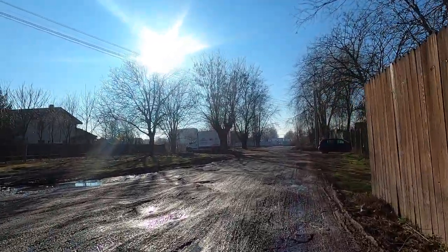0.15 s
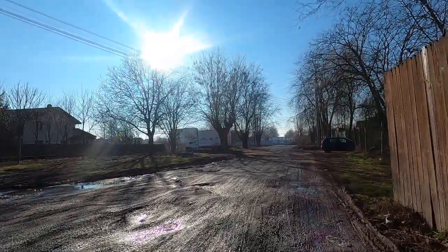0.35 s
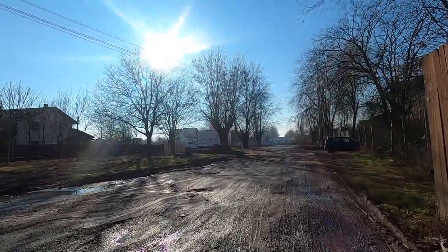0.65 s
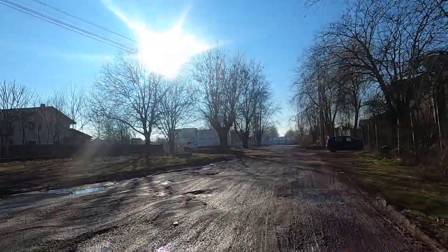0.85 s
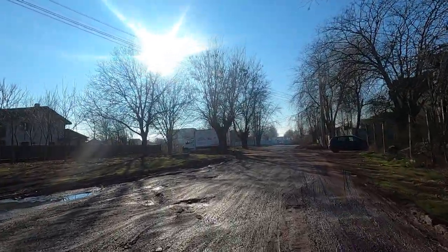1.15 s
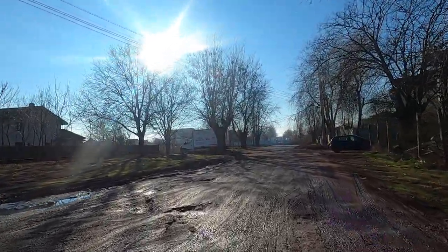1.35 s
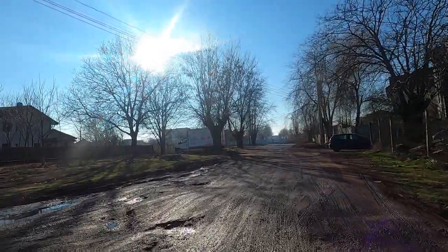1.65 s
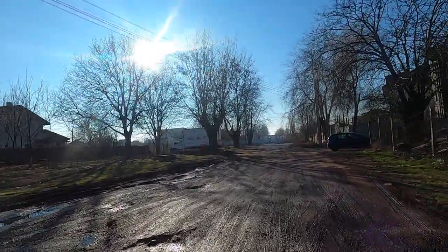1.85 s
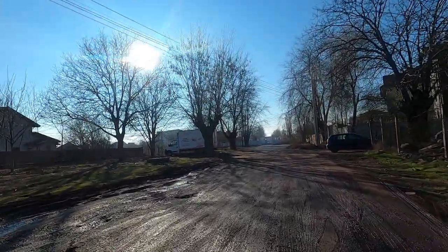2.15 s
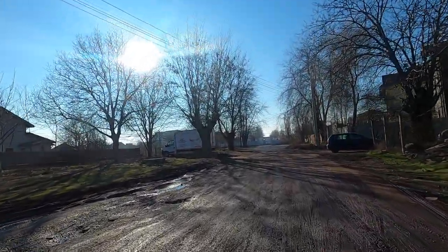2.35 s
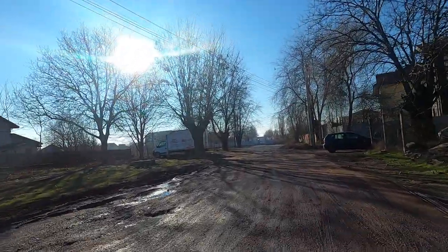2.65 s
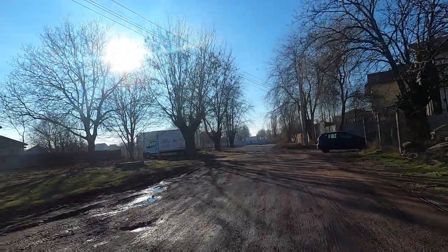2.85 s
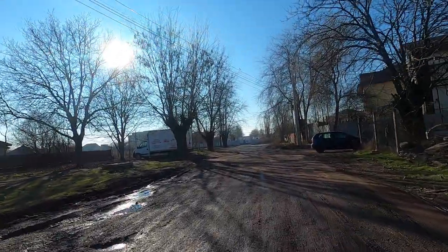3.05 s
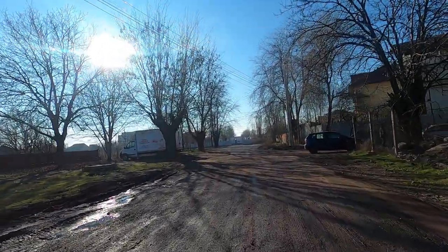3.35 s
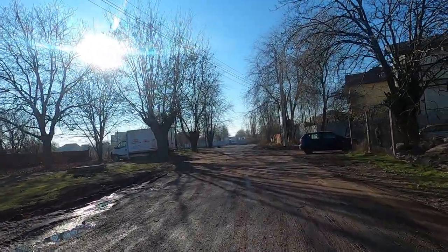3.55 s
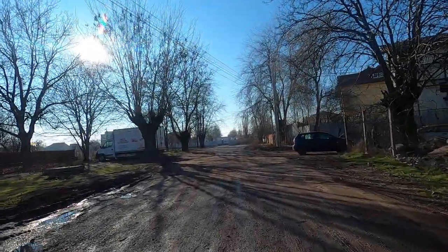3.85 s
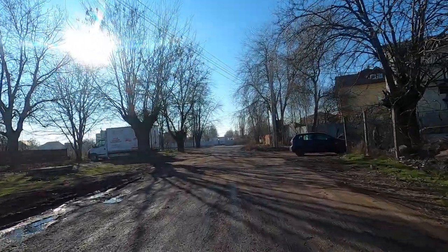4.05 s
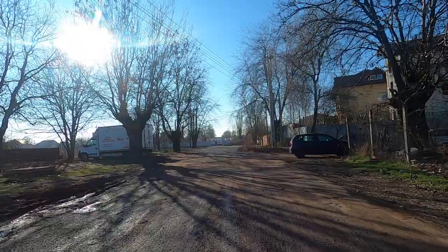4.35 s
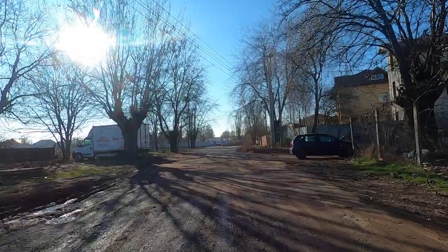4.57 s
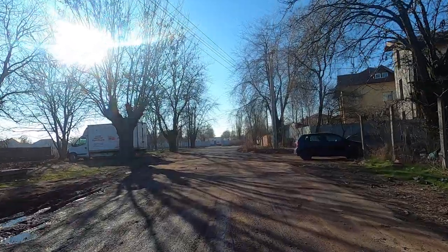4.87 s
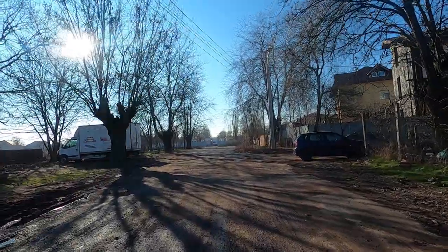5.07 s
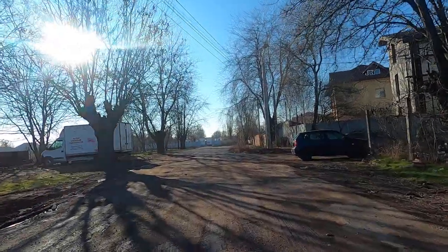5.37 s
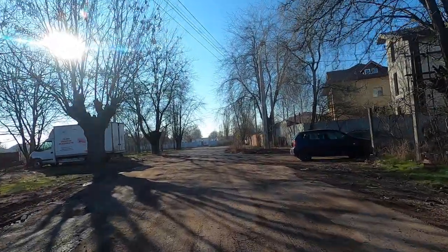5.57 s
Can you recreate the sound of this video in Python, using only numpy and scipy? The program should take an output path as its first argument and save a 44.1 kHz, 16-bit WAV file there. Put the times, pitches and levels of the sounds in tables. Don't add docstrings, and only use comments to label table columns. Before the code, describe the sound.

Close-up bike ride over mud: soft tyre hiss, popping grit, loose-part rattles, a deep wavering hum and wind thumping the microphone.

```python
import sys
import numpy as np
from scipy import signal
from scipy.fft import rfft, irfft
from scipy.io import wavfile
from scipy.ndimage import uniform_filter1d

SR = 44100
rng = np.random.default_rng(int(sys.argv[2]) if len(sys.argv) > 2 else 0)


def dump_mix(stems):
    frames = np.atleast_2d(stems).T
    limited = np.clip(frames, -1, 1)
    pcm = np.round(limited * 32767).astype(np.int16)
    wavfile.write(sys.argv[1], SR, pcm)


def magnitude_from_level(level_db):
    exponent = np.asarray(level_db, float) / 20
    return 10 ** exponent


N = 251811
STEP = 128


def unit(x):
    return x / np.sqrt(np.mean(x ** 2))


def curves(table):
    s, *columns = np.transpose(table)
    return [np.interp(np.arange(N) / SR, s, c) for c in columns]


def band(x, lo_hz, hi_hz, order=2):
    return signal.sosfilt(signal.butter(order, [lo_hz, hi_hz], "bandpass", fs=SR, output="sos"), x)


def walk(rate_hz):
    k = int(SR / rate_hz)
    x = np.repeat(rng.standard_normal(N // k + 1), k)
    return unit(uniform_filter1d(uniform_filter1d(x, k), k)[:N])


def ring(x, modes):
    out = 0
    for hz, db, t60_s in modes:
        r = np.exp(-np.log(1000) / (t60_s * SR))
        w = 2 * np.pi * hz / SR
        out = out + magnitude_from_level(db) * signal.lfilter([np.sin(w)], [1, -2 * r * np.cos(w), r * r], x)
    return out


def colour(x, points):
    hz, db = np.transpose(points)
    grid_hz = np.linspace(1, SR / 2, 513)
    log_gain = np.log(magnitude_from_level(np.interp(np.log(grid_hz), np.log(hz), db)))
    cepstrum = irfft(log_gain)
    cepstrum[1:512] *= 2
    cepstrum[513:] = 0
    return signal.fftconvolve(x, irfft(np.exp(rfft(cepstrum))))[:N]


def add(track, s, piece):
    i = int(s * SR)
    track[i:i + len(piece)] += piece[:N - i]


def dull(x, hz=7500):
    return signal.sosfilt(signal.butter(5, hz, fs=SR, output="sos"), x)


def even(x, span_s):
    return unit(x / np.sqrt(uniform_filter1d(x ** 2, int(span_s * SR)) + 0.83 * np.mean(x ** 2)))


def swells(s, hold_s, db, rise_db_s, fall_db_s):
    t = np.arange(0, N, STEP)[None] / SR - s[:, None]
    rise_db = rise_db_s * np.minimum(t, 0)
    fall_db = fall_db_s * np.maximum(t - hold_s[:, None], 0)
    return magnitude_from_level(2 * np.maximum(db[:, None] + rise_db - fall_db, -150))


def smooth(x):
    return np.interp(np.arange(N), np.arange(len(x)) * STEP, x)


def total_db(power, under_db):
    return 10 * np.log10(smooth(power.sum(axis=0)) + magnitude_from_level(2 * under_db))


def mount():
    # (time [s], hold [s], level [dB], pitch [Hz])
    jolts = [(0.102, 0.1, -32.5, 78.05), (0.314, 0.024, -28, 70.5), (0.376, 0.088, -27.5, 75.4),
             (0.56, 0.061, -32.5, 79.8), (0.66, 0.11, -27, 74.66), (0.862, 0.043, -24, 80.04),
             (0.988, 0.053, -22, 74.13), (1.061, 0.082, -20, 76.5), (1.212, 0.05, -25, 76.05),
             (1.374, 0.035, -17, 75.9), (1.482, .12, -16.5, 77.44), (1.668, 0.23, -18.5, 77.03),
             (1.986, .24, -22.5, 75.4), (2.278, 0.11, -28, 71.05), (2.49, 0.14, -20.5, 77.07),
             (2.65, .115, -17.5, 77), (2.984, 0.12, -17, 78.26), (3.22, 0.093, -26, 79.9),
             (3.422, 0.02, -27, 86.6), (3.552, 0.046, -22.5, 80.3), (3.695, 0.015, -21, 77.3),
             (3.748, .012, -18, 85), (3.795, .03, -23, 77), (3.894, 0.046, -29, 74),
             (4.06, 0.015, -25.5, 77.7), (4.118, 0.12, -29, 70.9), (4.359, 0.085, -21, 75.94),
             (4.49, 0.013, -28.5, 80), (4.62, 0.062, -24, 83.1), (4.787, 0.099, -20.5, 90.75),
             (4.944, 0.07, -19.5, 79.26), (5.106, 0.26, -23.5, 69.98), (5.395, 0.32, -27, 79.9)]
    s, hold_s, db, hz = np.transpose(jolts)
    power = swells(s, hold_s, db, rise_db_s=301, fall_db_s=271)
    level_db = total_db(power, -70)
    pitch_hz = smooth(hz @ power / power.sum(axis=0)) + 2.458 * walk(13)
    tone = np.sqrt(2) * np.sin(2 * np.pi * np.cumsum(pitch_hz) / SR) * magnitude_from_level(0.21 * walk(8.7))
    shake = even(band(rng.standard_normal(N), 66, 94), span_s=0.051)
    return magnitude_from_level(level_db) * (magnitude_from_level(-1.0) * tone + magnitude_from_level(-11.5) * shake)


def wind():
    # (time [s], level [dB])
    breeze = [
        (0, -36),
        (.7, -38),
        (1.3, -35.5),
        (2.1, -30),
        (3.2, -34),
        (3.9, -28),
        (4.6, -35),
        (4.95, -28),
        (5.5, -24.5),
        (5.71, -24),
    ]
    # (time [s], hold [s], level [dB], sharpness [dB])
    gusts = [(0.348, .01, -33.5, -12), (0.423, 0.066, -29.5, -25), (0.858, 0.15, -37, -10),
             (1.095, .01, -24, -28), (1.419, 0.037, -26, -5.5), (1.509, .03, -29.5, 3),
             (1.557, 0.049, -26, -25), (1.7, 0.07, -25.5, -24), (2.031, 0.058, -29.5, -11.5),
             (2.225, 0.03, -30.5, 1), (2.296, 0.21, -33, -6.5), (2.605, 0.15, -31, 2),
             (2.768, 0.023, -30, -19), (2.861, 0.015, -25, -1.5), (3.021, 0.11, -28.5, -37),
             (3.29, 0.053, -38, -3), (3.43, 0.031, -33, 1), (3.663, 0.1, -28, -17),
             (3.832, 0.019, -31, -11), (3.986, 0.025, -31, -7.5), (4.19, 0.045, -35, 3.5),
             (4.297, 0.23, -34.5, -2.5), (4.715, 0.11, -22, -9.5), (4.903, 0.11, -26.5, -11),
             (5.08, 0.019, -27, -2), (5.171, 0.18, -26.5, -2), (5.432, 0.028, -36, 5),
             (5.549, 0.043, -28, -17), (5.641, 0.013, -28, 3)]
    # (time [s], peak [dB], pitch [Hz])
    thumps = [(1.486, -22, 220.2), (1.545, -24, 400), (3.03, -24, 215), (2.246, -31, 249),
              (2.624, -19.5, 232), (2.661, -33, 290), (2.705, -23.5, 325), (2.847, -26, 277),
              (3.651, -29, 231), (2.661, -18, 193), (2.68, -18, 195), (2.729, -38, 203),
              (2.864, -26.5, 398.1), (2.89, -29, 240), (3.707, -27, 180), (3.713, -18, 155),
              (3.729, -27, 250), (3.742, -23, 300), (5.066, -26, 191), (5.108, -23, 193), (5.214, -27, 170),
              (5.246, -18, 198), (5.39, -22, 200), (5.149, -16, 194), (5.347, -13, 210), (5.6335, -17, 300),
              (5.639, -12, 170), (5.653, -14, 60)]
    gust_deep_db, lull_body_db, lull_edge_db = -11, -11, -10
    breeze_db, = curves(breeze)
    s, hold_s, db, sharp_db = np.transpose(gusts)
    power = swells(s, hold_s, db, rise_db_s=304.5, fall_db_s=251)
    deep_db = total_db(power * magnitude_from_level(2 * gust_deep_db), breeze_db + 2.5 * walk(9))
    body_db = total_db(power, breeze_db + lull_body_db) + 2.78 * walk(25)
    edge_db = total_db(power * magnitude_from_level(2 * sharp_db)[:, None], breeze_db + lull_edge_db) + 2.65 * walk(35) - 4.0
    eddies = rng.standard_normal((3, N))
    deep = even(band(eddies[0], 19.4, 68.0, order=3), span_s=0.26)
    body = even(band(eddies[1], 91.1, 133.1, order=3), span_s=0.094)
    edge = even(band(band(eddies[2], 134, 162, order=1), 168.3, 480), span_s=0.099)
    out = magnitude_from_level(deep_db) * deep + magnitude_from_level(body_db) * body + magnitude_from_level(edge_db) * edge
    t = np.arange(int(0.012 * SR)) / SR
    swell = t / .003 * np.exp(1 - t / .003)
    for s, db, hz in thumps:
        add(out, s, magnitude_from_level(db - 3) * np.sin(2 * np.pi * hz * t) * swell)
    return out


def tyres():
    # (time [s], level [dB], grittiness [dB])
    roll = [(0, -46.5, 2), (.35, -46.5, -11), (.7, -49.5, -1.5), (1.2, -48, -25), (1.5, -51, 5.5),
            (1.95, -47.5, -14), (2.33, -51, -11), (2.65, -43, 1), (2.9, -47.5, 0.5), (3.45, -52, 6.5),
            (3.8, -51, 2.5), (4.05, -49, 4.5), (4.35, -53.5, 11.5), (4.72, -53.5, 4.5), (4.95, -46, -1),
            (5.2, -46.5, -1), (5.55, -49, 5), (5.71, -46, 3)]
    # (frequency [Hz], level per Hz [dB])
    tread_points = [(200, -9.5), (400, -7), (800, -12.5), (1800, -11.5), (2700, -9.5), (3050, -9),
                    (3450, -6.5), (4000, -9), (4650, -6.5), (5500, -12), (7600, -21), (9000, -28),
                    (12700, -38.5), (15500, -58)]
    # (frequency [Hz], width [Hz], level [dB])
    frame_modes = [(520, 46, 0), (571, 44, -3.5), (677, 43, -14)]
    # (time [s], hold [s], level [dB])
    splashes = [(0.2, .005, -50), (0.293, 0.033, -56), (0.603, 0.033, -62.5), (0.897, 0.015, -62),
                (1.203, 0.02, -55.5), (1.355, 0.021, -53.5), (1.53, 0.011, -49.5), (1.78, 0.016, -57),
                (1.978, 0.018, -53), (2.047, .02, -55.5), (2.08, .01, -57), (2.204, 0.0032, -52),
                (2.346, .008, -65), (2.448, .02, -62), (2.384, 0.036, -60), (2.543, 0.0083, -54),
                (3.007, 0.026, -50.5), (3.22, 0.0084, -71), (3.292, 0.012, -59.5), (3.431, 0.011, -58),
                (3.469, .01, -63), (3.926, 0.067, -55.5), (4.235, 0.053, -59), (4.315, 0.03, -61.5),
                (4.547, 0.023, -77), (4.638, 0.016, -61), (4.741, 0.083, -60), (4.888, .02, -69),
                (5.243, .01, -55), (5.448, 0.0065, -55), (5.634, 0.0075, -73)]
    # (time [s], hold [s], level [dB])
    ruts = [(0.03, 0.17, -48.5), (0.923, 0.035, -51), (1.14, .03, -59), (1.374, .02, -51),
            (1.471, 0.032, -43), (2.053, 0.076, -49), (2.22, 0.0084, -47), (3.026, 0.066, -50),
            (3.109, 0.043, -43), (3.448, .02, -45), (4.846, 0.12, -42.5), (5.004, 0.53, -45)]
    splash_mud_db, splash_grit_db = 4, 3
    fork_hz, fork_width_hz, fork_db = 207.2, 12.4, -46.5
    grain_share = .65

    roll_db, gritty_db = curves(roll)
    swing_db = roll_db - roll_db.mean()
    splash = swells(*np.transpose(splashes), rise_db_s=499, fall_db_s=260)
    rut = swells(*np.transpose(ruts), rise_db_s=200, fall_db_s=600)
    grit_db = total_db(splash * magnitude_from_level(2 * splash_grit_db), roll_db + gritty_db)
    mud_db = total_db(splash * magnitude_from_level(2 * splash_mud_db), roll_db)
    spray_db = total_db(splash, 0.44 * swing_db + 0.053 * gritty_db - 59.5)
    ring_db = total_db(rut, 0.14 * swing_db - 50.5)

    bunch = walk(30)
    pops = 0
    for hz in 900 * 2 ** np.arange(0, 2.9, .36):
        chance = rng.random((3, N))
        pops_per_s = 170 * magnitude_from_level(4.5 * bunch + 4.5 * walk(60))
        size_db = np.minimum(-3.5 * np.log(chance[1]), 10.5)
        hits = (chance[0] < pops_per_s / SR) * magnitude_from_level(size_db) * np.sign(chance[2] - .5)
        pops = pops + band(hits, hz / 1.12, hz * 1.12)
    hiss = rng.standard_normal(N) * magnitude_from_level(0.089 * bunch + 1.0 * walk(65))
    tread = colour(unit(hiss) + grain_share * unit(pops), tread_points)
    low = signal.sosfiltfilt(signal.butter(1, 2000, fs=SR, output="sos"), tread)
    mud, grit = unit(low), unit(tread - low)
    mist = rng.standard_normal(N) * magnitude_from_level(0.95 * bunch + 2.6 * walk(70))
    spray = unit(band(colour(mist, tread_points), 6980, 14700))

    road = rng.standard_normal(N) * magnitude_from_level(2.35 * walk(24.55))
    frame = 0
    for hz, width_hz, db in frame_modes:
        frame = frame + magnitude_from_level(db) * unit(band(road, hz - width_hz / 2, hz + width_hz / 2, order=1))
    fork = unit(band(road, fork_hz - fork_width_hz / 2, fork_hz + fork_width_hz / 2, order=1))
    fork = fork * magnitude_from_level(1.4 * walk(5.98))
    rolling = magnitude_from_level(grit_db - 6.0) * grit + magnitude_from_level(mud_db + 3.5) * mud + magnitude_from_level(spray_db + 1.0) * spray
    return rolling + magnitude_from_level(ring_db - 0.5) * unit(band(frame, 520, 750)) + magnitude_from_level(fork_db) * fork


def snaps():
    # (time [s], peak [dB], centre [Hz])
    snap_events = [(0.277, -23, 4240), (0.591, -22.5, 4430), (0.753, -24, 4800), (1.03, -26, 4770),
                   (1.487, -20, 4330), (1.6692, -23, 4560), (3.3569, -21, 3600), (1.764, -18, 3910),
                   (1.776, -24, 3400), (2.6152, -16.5, 3498), (2.6231, -19, 3460), (2.7355, -31, 3614),
                   (2.807, -11.5, 3733), (2.9, -23, 4326), (3.0075, -10.5, 4600), (3.2308, -21, 3290),
                   (3.3555, -19, 3490), (3.3672, -14, 4100), (3.4392, -14, 4000), (3.5065, -23, 3850),
                   (3.997, -24, 3255), (4.3287, -22.5, 3440), (4.4207, -17, 3310), (4.7662, -26.5, 3384),
                   (5.0046, -16.5, 3600), (5.145, -21.5, 3986), (5.3086, -23, 3260)]
    # (time [s], peak [dB], centre [Hz])
    pop_events = [(2.7843, -22, 1250), (0.447, -24.5, 1750), (1.1787, -26, 2710), (1.351, -24, 2150),
                  (1.4674, -23, 1680), (1.5243, -30, 2310), (1.9686, -32, 2820), (2.0401, -21, 2370),
                  (2.0631, -20.5, 1560), (2.156, -21.5, 3250), (2.1911, -21.5, 2416), (2.245, -27, 2310),
                  (2.656, -28, 1590), (2.83, -34, 2404), (2.873, -22.5, 2330), (3.3194, -35, 2254),
                  (3.5767, -21.5, 2690), (3.5824, -22, 2548), (3.7674, -25.5, 2290), (3.9436, -22.5, 2830),
                  (4.0264, -27, 2690), (4.6403, -21, 2738), (4.7863, -29, 1766), (5.0666, -15.5, 2640),
                  (5.5657, -24, 1500), (5.6733, -19.5, 2320)]
    # (time [s], peak [dB], centre [Hz])
    crack_events = [(0.3149, -14.5, 2150), (0.612, -19, 1900), (1.2077, -12, 1600), (2.427, -16, 2860),
                    (2.6098, -4, 2180), (2.6372, -16, 1762), (2.6755, -10.5, 2290), (2.6951, -9, 2200),
                    (2.7096, -4.5, 1750), (5.2586, -6.5, 1720), (5.2786, -15, 2470), (5.4565, -14, 1847)]
    # (time [s], peak [dB], centre [Hz])
    tick_events = [(0.051, -31, 4490), (.5222, -31, 3300), (.7292, -28, 3110), (.9168, -30, 3380),
                   (1.4331, -32, 3640), (1.692, -29, 2290), (1.8003, -39, 3466), (1.9675, -32, 4000),
                   (2.004, -28, 4500), (2.0403, -27, 4500), (2.0794, -29, 4600), (2.1567, -26, 4535),
                   (2.2455, -33, 4720), (2.3403, -30.5, 3796), (2.4025, -26, 3013), (2.4207, -34, 4600),
                   (2.441, -34, 4700), (2.668, -27, 2800), (2.7838, -29, 2372), (2.8295, -25, 3470),
                   (3.2091, -31, 4650), (3.2851, -25, 3800), (3.3187, -29, 4300), (3.4333, -17, 4300),
                   (3.565, -31, 4395), (3.6112, -31, 4534), (3.7749, -24, 4835), (3.8937, -27, 3410),
                   (3.9723, -26, 4090), (4.0645, -29, 2990), (4.0823, -26, 3500), (4.3462, -26, 4510),
                   (4.3718, -24, 4263), (4.4746, -25, 4600), (5.012, -26, 3992), (5.1066, -29, 3320),
                   (5.2111, -28, 3610), (5.2335, -29, 4480), (5.248, -23.5, 4180), (5.346, -27, 3200),
                   (5.3806, -30, 4550), (5.394, -24, 4500), (5.4266, -26, 3390), (5.4546, -20.5, 3980),
                   (5.59, -31, 2608), (5.611, -24.5, 3917), (3.359, -18, 4500), (2.625, -20, 3000),
                   (2.6577, -24, 3300), (2.4677, -30, 1700), (2.7375, -24, 1700), (2.9002, -26, 1300),
                   (5.113, -28, 3330), (5.1449, -26, 1400), (2.683, -24, 3300)]
    # (spread [octaves], fizz [dB])
    kinds = [
        (.36, -19),
        (.5, -21),
        (1.05, -23),
        (0.38, -17),
    ]
    lead_s, fizz_s = .002, .0034
    out = np.zeros(N)
    t = np.arange(int(0.039 * SR)) / SR - lead_s
    burst = np.arange(len(t)) == int(lead_s * SR)
    fizz = np.exp(-np.abs(t) / np.where(t < 0, lead_s, fizz_s))
    groups = (snap_events, pop_events, crack_events, tick_events)
    for events, (octaves, fizz_db) in zip(groups, kinds):
        spread = 2 ** octaves
        for s, db, hz in events:
            noise = rng.standard_normal(len(t))
            source = burst + magnitude_from_level(fizz_db) * noise * fizz
            crack = band(source, hz / spread, min(hz * spread, 9000), order=3)
            add(out, s + 0.001297 - lead_s, -magnitude_from_level(db - 6.5) * crack / np.abs(crack).max())
    return dull(out, hz=5600)


def yelps():
    # (time [s], length [s], pitch [Hz], level [dB], octave [dB])
    calls = [
        (.12, 0.085, 498, -55, 15),
        (.2, 0.048, 504, -52, 2),
        (2.09, 0.13, 520, -37.5, -12),
        (4.77, .08, 520, -38.5, -21),
        (4.82, 0.048, 520, -33, -19),
        (4.867, .035, 507.3, -29, -16),
        (5.31, 0.13, 519.6, -35, -12),
    ]
    out, waver = np.zeros(N), walk(140)
    for s, length_s, hz, db, octave_db in calls:
        n = int(length_s * SR)
        phase = 2 * np.pi * hz * np.cumsum(1 + 0.055 * waver[int(s * SR):][:n]) / SR
        voice = np.sin(phase) + magnitude_from_level(octave_db) * np.sin(2 * phase)
        add(out, s - length_s / 2, magnitude_from_level(db) * np.hanning(n) * voice)
    return out


def knocks():
    # (time [s], peak [dB], pitch [Hz], t60 [s])
    struck_modes = [(1.540, -26, 654, 0.041), (1.5515, -18.5, 559, 0.045), (1.537, -24, 2385, 0.027),
                    (1.540, -34, 1530, 0.022), (1.881, -24.5, 2700, 0.019), (1.883, -37, 1550, .025),
                    (1.897, -43, 2870, 0.029), (3.4672, -17, 2460, 0.014), (3.473, -22, 2540, 0.021),
                    (3.47, -30, 1550, 0.026), (4.126, -27, 2447, 0.024), (4.857, -33.5, 2700, 0.022),
                    (4.859, -36, 1337, 0.022), (4.86, -34, 2120, .02), (1.553, -29, 726, 0.033),
                    (1.882, -19.5, 597, 0.03), (1.885, -28, 654, 0.076), (1.886, -31.5, 930, 0.031),
                    (1.887, -28, 2140, 0.026), (2.207, -25, 620, 0.031), (2.213, -32.5, 672, 0.075),
                    (2.208, -23.5, 1320, 0.015), (2.210, -21, 3025, 0.014), (2.221, -34, 2670, 0.027),
                    (2.533, -30, 2780, .03), (2.212, -25, 2470, 0.017), (1.548, -34, 855, 0.054),
                    (2.540, -30.5, 560, 0.046), (2.549, -34, 608, 0.073), (2.539, -22.5, 1080, 0.018),
                    (2.543, -27.5, 2750, 0.04), (2.575, -34.5, 564, 0.087), (3.105, -33.5, 684, .1),
                    (3.469, -29.5, 682, 0.073), (3.839, -35, 521, 0.071), (4.126, -34.5, 679, 0.051),
                    (3.106, -30, 1320, .025), (3.133, -31, 650, .04), (0.91, -36, 560, .04),
                    (1.207, -30, 1050, .02), (1.54, -62, 15435, .03), (3.468, -68, 15435, .03),
                    (3.841, -66, 15435, .03), (2.208, -66, 15435, .03), (0.753, -34, 4800, .014),
                    (1.031, -37, 4770, .014), (0.276, -36, 4240, .02), (3.008, -29, 4880, .014),
                    (2.61, -24, 1100, .012), (5.259, -27, 1300, .014)]
    damping, rise_s = 1.6, 0.001
    out = np.zeros(N)
    t = np.arange(int(.15 * SR)) / SR
    push = 1 - np.exp(-t / rise_s)
    for s, db, hz, t60_s in struck_modes:
        decay = magnitude_from_level(db - 60 * (t / t60_s) ** damping)
        add(out, s, decay * push * np.sin(2 * np.pi * hz * t))
    return out


def clacks():
    # (time [s], peak [dB], tube ring [dB], bright [dB], loudest plate mode [Hz])
    blows = [(1.2106, -34, -2, 4, 2330), (1.5388, -23, 10, 4, 2330), (1.5486, -34, -2, 11, 2768),
             (1.8818, -24, 3.5, -14, 2671), (2.2085, -21.5, 5, -7, 2800), (2.5389, -19.5, 3, -3, 2750),
             (2.9332, -27.5, -2, -27, 2700), (3.1046, -26.5, 5, -18, 2700), (3.4676, -21, 5, -14, 2424),
             (3.8404, -27.5, 8.5, -2.5, 2970), (4.1248, -24.5, 3, -12, 2484), (4.8577, -32, 6, -11, 2760)]
    # (frequency [Hz], level [dB], t60 [s])
    tube_modes = [(550, 9, .04), (615, 8, .04), (680, 6, .045), (765, 5, .04), (855, 1, .04),
                  (940, -1, .04), (1120, 0, .04), (1375, 4, .025), (1630, 4, .012)]
    # (frequency [Hz], level [dB], t60 [s])
    plate_modes = [(2150, -8, 0.006), (2450, 5, 0.007), (2780, 0, 0.015), (3200, -6, 0.01),
                   (3920, -11, 0.015)]
    # (frequency [Hz], level [dB], t60 [s])
    edge_modes = [(4650, 8.5, 0.0086), (5660, 1, 0.0072), (6460, -1, 0.0043), (7440, -20, .01)]
    rattle_s, scatter_db, scrape_share = 0.012, 3.5, .8
    out = np.zeros(N)
    t = np.arange(int(.15 * SR)) / SR
    envelope = np.minimum(t / .003, 1) * np.exp(-(t / rattle_s) ** 2)
    for s, db, tube_db, bright_db, main_hz in blows:
        draw = rng.standard_normal((4, len(t)))
        contacts = draw[0] * (draw[1] > .9) * envelope
        parts = []
        for k, modes in enumerate(([*plate_modes, (main_hz, 1.5, .022)], tube_modes, edge_modes)):
            shifted = [(hz * (1 + 0.036 * a), mode_db + scatter_db * b, t60_s)
                       for (hz, mode_db, t60_s), a, b in zip(modes, draw[2], draw[3, k * 8:])]
            parts.append(ring(contacts, shifted))
        parts.append(band(contacts, 900, 3600))
        plate, tube, edge, scrape = (p / np.abs(p).max() for p in parts)
        clack = plate + magnitude_from_level(tube_db - 6) * tube + magnitude_from_level(bright_db) * edge + scrape_share * scrape
        add(out, s - .001, magnitude_from_level(db - 1) * band(dull(clack), 500, 16000, order=3))
    return out


def scene():
    tail = np.minimum(np.arange(N)[::-1] / (.004 * SR), 1)
    lows = (mount() + wind()) * tail
    return (lows + tyres() + snaps() + yelps() + knocks() + clacks())[None]


def top_cut(x):
    return signal.sosfilt(signal.butter(12, 15650, fs=SR, output="sos"), x)


def record(dry):
    return top_cut(dry)


dry = scene()
out = record(dry)
dump_mix(out)
```